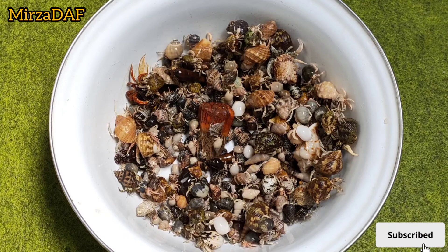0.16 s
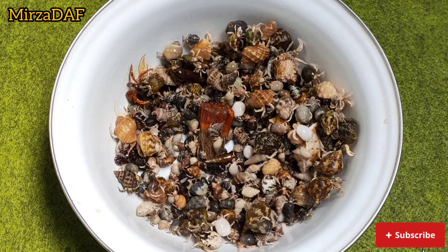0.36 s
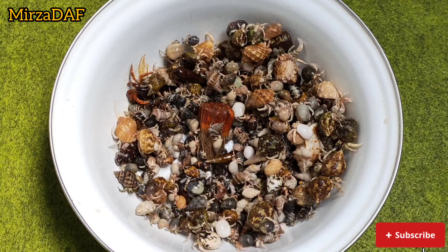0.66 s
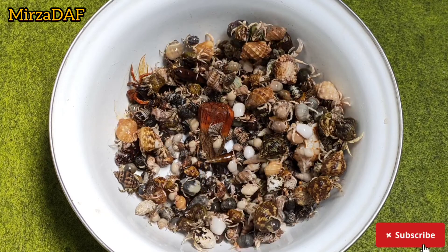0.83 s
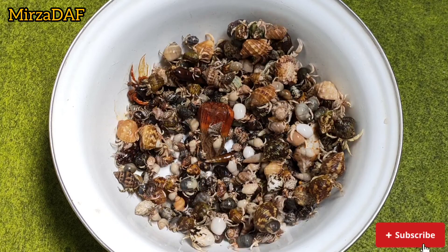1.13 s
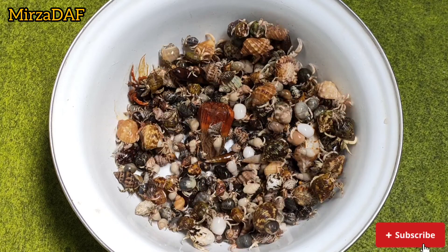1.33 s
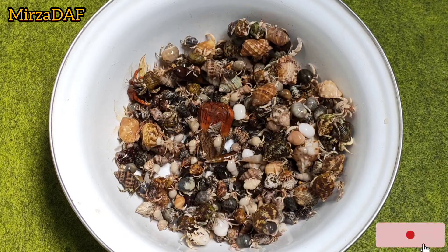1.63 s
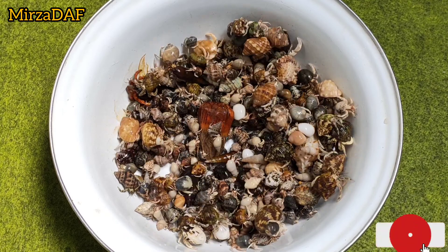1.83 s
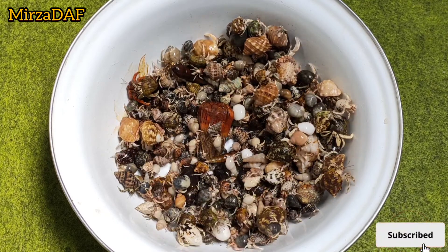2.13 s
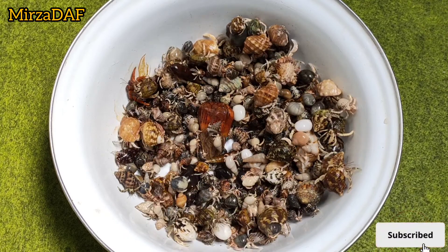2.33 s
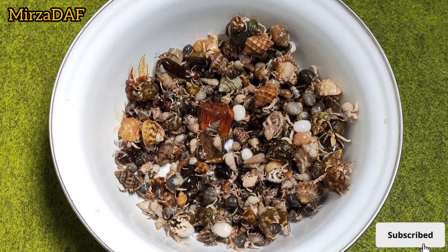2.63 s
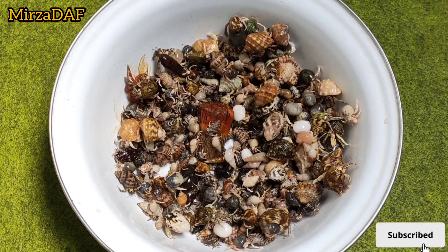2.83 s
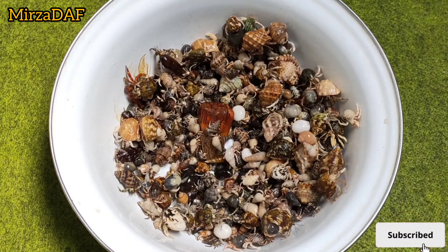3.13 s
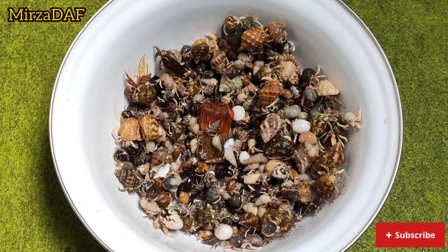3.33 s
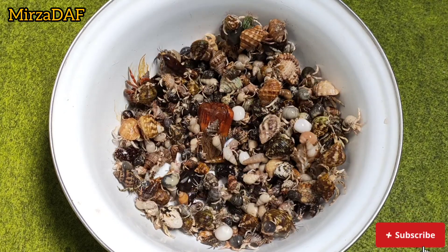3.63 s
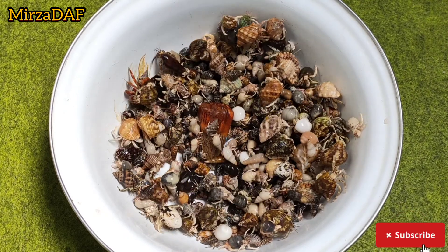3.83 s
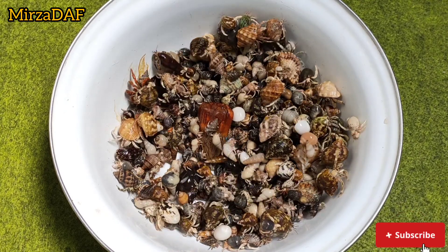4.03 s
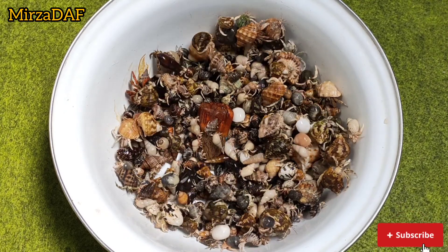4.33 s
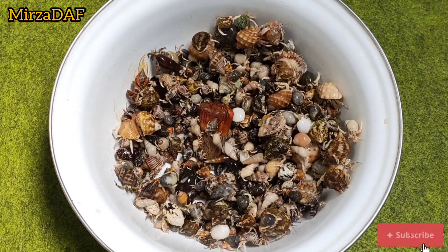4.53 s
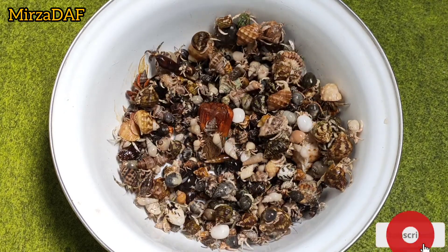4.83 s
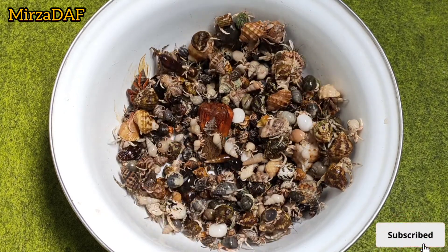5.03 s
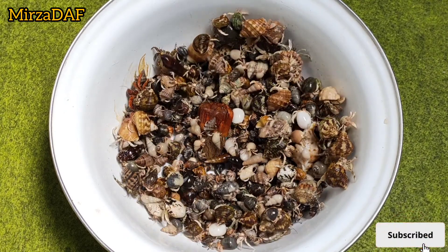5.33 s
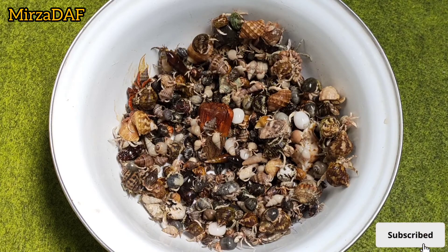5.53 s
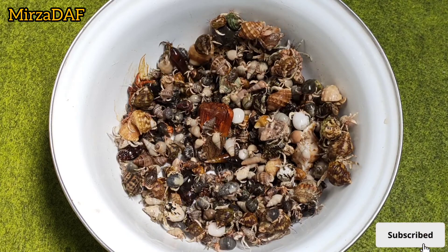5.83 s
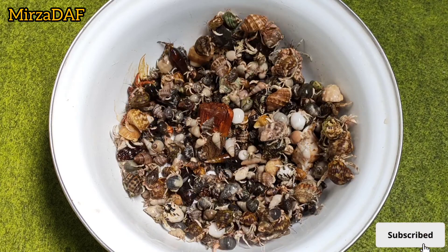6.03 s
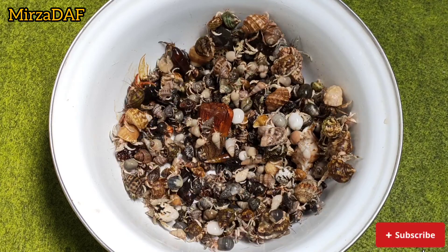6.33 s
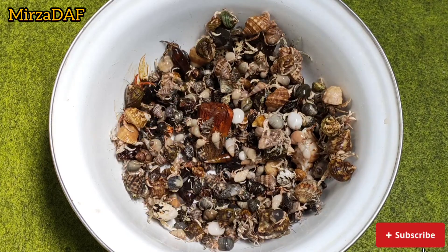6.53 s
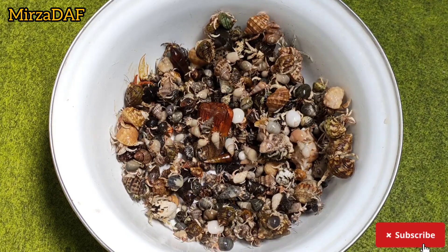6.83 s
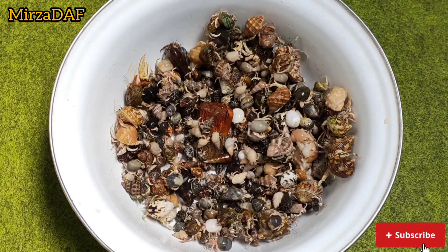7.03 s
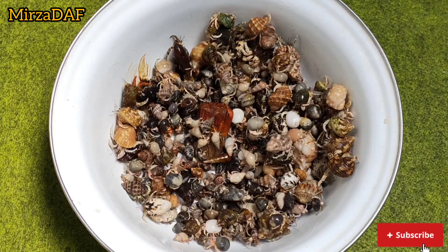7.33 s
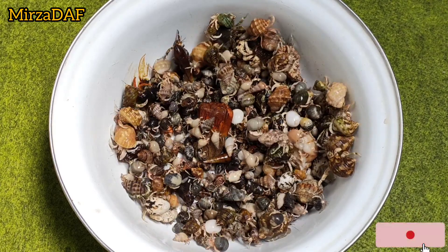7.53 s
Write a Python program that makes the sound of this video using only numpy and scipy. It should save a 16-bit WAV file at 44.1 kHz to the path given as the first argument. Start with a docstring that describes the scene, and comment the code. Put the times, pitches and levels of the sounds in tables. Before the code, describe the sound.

Dozens of small hermit crabs crawl in a plastic bowl, heard very close in stereo. Crisp, high shell clacks come singly and in quick uneven clusters, some with a light plastic knock beneath. A continuous fine patter of legs fills the gaps, with brief scrapes and one soft gritty rustle early on. A small room answers shortly; faint air noise, low hum and a few dull bumps lie behind.

```python
"""Shells clack and chatter over a fine patter of legs: hermit crabs crawl over each other in a plastic bowl,
close under a stereo microphone. Each clack is a cluster of random taps ringing a shell and the modes of the bowl.
Patter is many lighter shell taps; scrapes and rustle are uneven, filtered noise; a small room answers with noise tails.
Behind are noise for room air, drifting sines for appliance hum, low drone and a faint far tone,
and a few dull bumps of filtered noise."""
import sys
import numpy as np
from scipy import signal
from scipy.fft import rfft, irfft
from scipy.io import wavfile

SR = 44100
rng = np.random.default_rng(int(sys.argv[2]) if len(sys.argv) > 2 else 0)


def generate_wav(signal):
    """Clip the signal to [-1, 1] and save it as 16-bit WAV at the path in sys.argv[1]."""
    frames = np.transpose(np.atleast_2d(signal))
    scaled = np.clip(frames, -1, 1) * 32767
    pcm = np.round(scaled).astype(np.int16)
    wavfile.write(sys.argv[1], SR, pcm)


N = 338240
BINS = np.fft.rfftfreq(2048, 1 / SR)  # Hz, for the colours of the clicks
LEAD_S = .003  # a shell starts to slip this long before it hits


def amp(db):
    """Decibels to gain."""
    return 10 ** (np.asarray(db) / 20)


def evened(x):
    """Scales to an rms of one over all channels."""
    return x / np.sqrt(np.mean(x ** 2) + 1e-20)


def unit(x):
    """Scales each channel to an energy of one."""
    return x / np.sqrt(np.sum(x ** 2, -1, keepdims=True) + 1e-20)


def read(points, hz):
    """Reads a table of (Hz, value) on a log-frequency axis."""
    f, value = np.transpose(points)
    return np.interp(np.log(hz + 1), np.log(f + 1), value)


def follow(rows):
    """Joins the rows of a curve over time, one array for each column after the seconds."""
    s, *columns = np.transpose(rows)
    return [np.interp(np.arange(N) / SR, s, c) for c in columns]


def add(mix, s, sound):
    """Adds a stereo sound at a time in seconds."""
    part = mix[:, max(round(s * SR), 0):][:, :sound.shape[1]]
    part += sound[:, :part.shape[1]]


def wander(per_s):
    """Slow random drift with an rms of one, mostly below per_s cycles a second."""
    size = 8192
    hz = np.fft.rfftfreq(size, N / SR / size)
    spectrum = rfft(rng.standard_normal(size)) / (1 + (hz / per_s) ** 4)
    drift = evened(irfft(spectrum))
    return np.interp(np.arange(N) * size / N, np.arange(size), drift)


def tone(hz):
    """A sine that follows a changing pitch."""
    return np.sin(2 * np.pi * np.cumsum(hz) / SR)


def causal(db):
    """The sharpest click that has this spectrum (minimum phase)."""
    log_gain = np.log(amp(np.concatenate([db, db[-2:0:-1]])))
    spectrum = np.exp(np.conj(signal.hilbert(log_gain)))
    return np.fft.ifft(spectrum).real[:len(db) // 2]


def bell(centre_hz, width_hz):
    """The bell shape of a resonance, one at its centre."""
    return 1 / (1 + (2 * (BINS - centre_hz) / width_hz) ** 2)


def burst(length_s, hz, width_hz, grain_db):
    """Uneven friction or a soft push into one resonance: a quick swell and a slower fade."""
    size = int(length_s * SR)
    u, f = np.arange(size) / size, np.fft.rfftfreq(size, 1 / SR)
    grains = np.interp(u * length_s, np.arange(500) / 500, rng.standard_normal(500))  # 500 a second
    push = rng.standard_normal((2, size)) * amp(grain_db * grains)
    ring = irfft(rfft(push) / (1 + (2 * (f - hz) / width_hz) ** 4), size)
    return evened(ring * np.sin(np.pi * u ** 0.51))


def room_air(level_db=-54):
    """Broadband noise of the room, much alike at both ears in the bass and mostly separate above."""
    # Colour of the air. Each row: frequency in Hz, relative level in dB per Hz.
    air_colour = [(10, 3.5), (25, -2.5), (45, -4.5), (90, 2.5), (125, -1), (180, -13.5), (280, -15.5),
                  (460, -16.5), (650, -16), (900, -21.5), (2500, -23.5), (5000, -34), (16000, -31.5)]
    # Left-right likeness of the air. Each row: frequency in Hz, correlation from 0 to 1.
    likeness = [(50, .999), (125, .97), (250, 0.84), (500, 0.065), (1000, 0.163), (4000, 0.16)]
    hz = np.fft.rfftfreq(N, 1 / SR)
    left, other = rfft(rng.standard_normal((2, N)))
    same = read(likeness, hz)
    right = same * left + np.sqrt(1 - same ** 2) * other
    return amp(level_db) * evened(irfft(np.array([left, right]) * amp(read(air_colour, hz)), N))


def appliance_hum(waver_hz=1.33, flutter_db=2.17):
    """Steady partials, each wavering a little in pitch and level on its own."""
    # Partials of the hum. Each row: frequency in Hz, rms level in dB before the flutter.
    partials = [(89, -59.5), (131, -67), (300, -72), (550, -71.5), (599, -75.5), (850, -83.5)]
    hum = np.zeros(N)
    for hz, db in partials:
        level = amp(db + flutter_db * wander(3.8))
        hum += level * tone(hz + waver_hz * wander(7.7))
    return np.sqrt(2) * hum  # a sine of rms one


def low_drone(level_db=-1, waver_hz=1.47, flutter_db=1.0):
    """One low sine that swells, sinks and drifts in pitch."""
    # Course of the drone. Each row: time in seconds, pitch in Hz before the waver,
    # rms level in dB before level_db and the flutter.
    drone_course = [(0.0, 42.33, -52), (1.09, 42.2, -47), (2.69, 42.4, -59), (2.78, 44.67, -54),
                    (3.56, 47.8, -50.5), (4.23, 47.63, -42.5), (5.45, 47.8, -43), (5.83, 46.95, -55),
                    (6.09, 46.1, -48), (7.01, 47.7, -56.5), (7.39, 47.7, -46), (7.67, 47.8, -50)]
    pitch, db = follow(drone_course)
    level = amp(db + level_db + flutter_db * wander(9.6))
    return np.sqrt(2) * level * tone(pitch + waver_hz * wander(6.7))


def whine(hz=400, waver_hz=7):
    """A faint far tone with a wavering pitch comes and goes."""
    # Each row: time in seconds, rms level in dB.
    swell = [(4.8, -110), (4.95, -69), (5.2, -67), (5.43, -70), (5.55, -110)]
    return np.sqrt(2) * amp(follow(swell)[0]) * tone(hz + waver_hz * wander(10.25))


def bumps(level_db=-1, upper_db=-13, side=.3):
    """Soft low bumps with a weaker, broader resonance an octave up, nearly the same at both ears."""
    # Dull bumps. Each row: start in seconds, length in seconds, centre in Hz, width in Hz,
    # level in dB before level_db.
    bump_rows = [(3.285, .075, 248, 400, -53), (3.444, 0.075, 160, 82, -48), (3.8, .12, 175, 38, -54.5),
                 (5.289, 0.073, 630, 130, -55), (5.78, 0.094, 157, 62, -47.5), (6.865, .13, 89, 15, -52.5)]
    out = np.zeros((2, N))
    for s, length_s, hz, width_hz, db in bump_rows:
        upper = amp(upper_db) / (1 + (hz / 400) ** 2)  # strongest for the deep bumps
        low_push = burst(length_s, hz, width_hz, 0)
        mid, apart = low_push + upper * burst(length_s, 2 * hz, 2 * width_hz, 0)
        add(out, s, amp(db + level_db) * (evened(mid) + side * np.array([apart, -apart])))
    return out


def room(x, rise_s=0.0067, count=3):
    """Dense noise tails whose treble dies first; successive clicks meet slightly different echoes."""
    # Decay of the room. Each row: frequency in Hz, time to fall by 60 dB in seconds.
    decay = [(300, 0.27), (2700, 0.31), (7000, 0.23), (15000, 0.2)]
    hz, t, z = signal.stft(rng.standard_normal((count, 2, SR // 2)), SR, nperseg=256)
    faded = z * amp(-60 * t / read(decay, hz)[:, None])
    tails = signal.istft(faded, SR, nperseg=256)[1]
    tail_t = np.arange(tails.shape[-1]) / SR
    tails = unit(tails * (1 - np.exp(-(tail_t / rise_s) ** 2)))
    turn = 2 * np.pi * np.arange(N) / SR  # the blend of tails turns once a second
    out = np.zeros((2, N))
    for k, tail in enumerate(tails):
        share = np.sqrt(2 / count) * np.cos(turn + np.pi * k / count)
        out += signal.oaconvolve(x * share, tail, axes=1)[:, :N]
    return out


def rustle(grain_db=3, grains_per_s=150):
    """Something brushes softly for half a second, catching as it goes: noise with uneven force."""
    # Course of the rustle. Each row: time in seconds, level in dB.
    brushing = [(1.95, -78), (2.1, -55), (2.25, -51.5), (2.42, -45), (2.52, -49.5), (2.62, -83),
                (2.7, -100)]
    # Gritty colour of the rustle. Each row: frequency in Hz, relative level in dB per Hz.
    grit_colour = [(100, -10), (250, -2.5), (500, 0), (900, -5), (1600, -8.5), (4000, -6), (8000, -1),
                   (16000, -10.5)]
    colour = amp(read(grit_colour, np.fft.rfftfreq(N, 1 / SR)))
    friction = rng.standard_normal((2, N)) * amp(grain_db * wander(grains_per_s))
    return amp(follow(brushing)[0]) * evened(irfft(rfft(friction) * colour, N))


def scrapes(level_db=-1, grain_db=5):
    """Claws and shells slide on the plastic, their uneven friction sounding one resonance."""
    # Scrapes on the bowl. Each row: start in seconds, length in seconds, centre in Hz, width in Hz,
    # level in dB before level_db.
    scrape_rows = [(0.381, 0.1, 3440, 4460, -55), (.94, 0.055, 2430, 900, -62),
                   (1.115, 0.052, 2640, 700, -62), (1.528, 0.089, 2630, 600, -63),
                   (1.716, .05, 2620, 1200, -60), (1.861, 0.042, 2570, 400, -56),
                   (6.264, 0.067, 1800, 1210, -57.5), (6.551, 0.021, 1533, 910, -55.5),
                   (6.629, 0.085, 1900, 2400, -60.5), (7.096, 0.13, 2683, 1300, -54)]
    out = np.zeros((2, N))
    for s, length_s, hz, width_hz, db in scrape_rows:
        add(out, s, amp(db + level_db) * burst(length_s, hz, width_hz, grain_db))
    return out


def overtones(count=7, width_hz=220, height_db=7):
    """The narrow modes that make one shell differ from the next, in dB."""
    modes = bell(rng.uniform(4900, 15360, (count, 1)), width_hz)
    return height_db * modes.max(0)


def chatter(decay_s, delay, per_s=6000, first=0.15, contact_s=0.00055, alike=0.39):
    """Shells slip, meet in a brief rough contact, then rebound and echo in the bowl, a bit apart at each ear."""
    slip, slip_s = .02, .0008  # energy and decay time of the slip; first is the contact's share of energy
    t = np.arange(SR // 36) / SR - LEAD_S
    hits = rng.standard_normal((3, len(t))) * (rng.random((3, len(t))) < per_s / SR)
    both_ears = np.sqrt(alike) * hits[0] + np.sqrt(1 - alike) * hits[1:]
    rebounds = unit(both_ears * (t > 0) * np.exp(-abs(t) / (2 * decay_s)))
    grit = rng.choice([-1, 1], len(t))
    contact = unit(grit * (t >= 0) * np.exp(-abs(t) / (2 * contact_s)))
    slide = unit(grit * (t < 0) * np.exp(-abs(t) / (2 * slip_s)))
    left, right = np.sqrt(slip) * slide + np.sqrt(first) * contact + np.sqrt(1 - first) * rebounds
    return np.array([left, np.roll(right, round(delay))])  # delay in samples


def patter(level_db=1.0, ring_db=9, ring_width_hz=350, vary_db=3, count=40):
    """Many legs tap many shells, each with its own ring and place in the heap."""
    # How busily the heap crawls. Each row: time in seconds, level in dB before level_db.
    bustle = [(0.0, -51), (0.3, -49.5), (1.11, -54.5), (1.62, -48), (1.83, -51.5), (2.39, -51.5),
              (2.58, -55.5), (3.27, -57), (3.44, -53.5), (4.04, -54.5), (4.8, -51), (5.47, -61.5),
              (5.7, -56), (6.11, -56), (6.6, -49), (7.01, -54.5), (7.26, -52), (7.67, -52.5)]
    # Colour of leg patter. Each row: frequency in Hz, relative level in dB per Hz.
    leg_colour = [(200, -46), (800, -22), (1600, -12), (2650, -7), (3800, -5), (5200, -5.5), (6400, 0.5),
                  (8000, 3), (9800, -4.5), (12000, -7.5), (16000, -11)]
    taps_each, spread_db, clump_db, chatter_s = 60, 5, 1.2, .0015
    out = np.zeros((2, N))
    for _ in range(count):
        colour = read(leg_colour, BINS) + ring_db * bell(rng.uniform(5540, 10170), ring_width_hz)
        colour = colour + overtones()
        colour = colour + vary_db * (rng.normal() * bell(1700, 2500) + rng.normal() * bell(16700, 4400))
        taps = chatter(chatter_s, rng.uniform(-4.5, 7))
        tick = unit(signal.fftconvolve(taps, causal(colour)[None], axes=1))
        force = np.minimum(rng.exponential(1, taps_each), 3)
        for s, db in zip(rng.random(taps_each) * N / SR, spread_db * force):
            add(out, s, amp(db) * tick)
    clumped = evened(out * amp(clump_db * wander(14)))
    return amp(level_db + follow(bustle)[0]) * clumped


def faint_clacks(count=28, level_db=-50.5, low_hz=6200, high_hz=8700):
    """Light touches of shell on shell at random moments, as rows like those of the louder clacks."""
    sparkle_db, knock_db, chatter_s = -10, -14, .0025
    rows = []
    for k, (when, small, side) in enumerate(rng.random((count, 3))):
        s = (k + when) / count * N / SR  # one in each equal stretch of time
        ring_hz = low_hz + (high_hz - low_hz) * small
        pan_db = 2 * (2 * side - 1)
        rows.append((s, level_db, sparkle_db, knock_db, ring_hz, pan_db, chatter_s))
    return rows


def clacks(ring_db=6, ring_width_hz=500, sparkle_db=8, knock_db=-1.5, body=0.5, room_db=-2.5):
    """Each clack rings one shell and knocks on the bowl beneath; the room answers both."""
    # Louder clacks of shell on shell. Each row: time in seconds, level of the shell in dB,
    # top sparkle in dB before sparkle_db, knock of the bowl in dB before knock_db, shell ring in Hz,
    # left over right in dB, decay time of the chatter in seconds.
    loud_clacks = [(0.0588, -33.5, -10, -6.5, 6300, -0.5, .003), (.147, -44.5, -9, -22, 8100, 1, .003),
                   (0.2252, -41.5, -20, -16, 8400, 1, .004), (0.244, -47, -1, -31, 8600, 1, 0.0018),
                   (.3815, -32, 1, -16.5, 7350, -0.5, .002), (0.399, -34.5, -1, -35, 8500, 8, .004),
                   (.413, -32.5, -2, -16, 8500, -1, 0.0036), (0.4483, -44.5, -6, -9, 7500, 0, 0.0045),
                   (0.529, -37.5, -4.5, -16, 7960, -6.5, .002), (.789, -40.5, -7, -22, 7650, 1, .004),
                   (0.956, -40.5, -15, -23, 6300, -2, 0.0054), (0.9854, -37, -18, -17, 6400, 0, 0.0058),
                   (1.0307, -39, -4, -11, 7350, 0, 0.0022), (1.1322, -47.5, -25, -4.5, 5480, -1, .004),
                   (1.223, -46, -26, -38, 7235, -1, .0008), (1.314, -55, -10, -7, 7120, 1, 0.0012),
                   (1.34, -39.5, 0, -17, 9500, 2, 0.0022), (1.3884, -30.5, -10, -28.5, 8200, 0, 0.012),
                   (1.5951, -32, -8, -54, 8300, -9, 0.0016), (1.6202, -34, -11, -43, 7440, -1, .004),
                   (1.7031, -34.5, -13, -35, 8400, -1, 0.014), (1.7332, -33.5, -13, -23, 7050, 0, 0.0044),
                   (1.802, -45.5, -17, -8, 8590, -1, .0024), (1.9752, -47, -18, -11, 8300, -10, .0025),
                   (2.0706, -37.5, -14, -15.5, 8400, 7, .0013), (2.1486, -28.5, -13, -38, 8060, 0, .004),
                   (2.166, -37, -7, -27, 8400, 2, .001), (2.225, -38, -7, -30, 8140, 3, 0.0016),
                   (2.6171, -41.5, -5, -18, 8160, -1, 0.0017), (2.7236, -34, -14, -22, 7700, 2, .003),
                   (2.8126, -39.5, -20, -24, 7200, -1, .0015), (3.0134, -35.5, -10, -37, 8300, -1, 0.0012),
                   (3.0616, -43.5, -6, -19, 8300, 2, 0.005), (3.2286, -39.5, -11, -20, 7340, -1, .0045),
                   (3.2629, -35.5, -14, -16.5, 6600, 1, 0.0051),
                   (3.3258, -37.5, -6, -11.5, 7100, -1, 0.014), (3.356, -39.5, -13, -9.5, 6400, 0, 0.0068),
                   (3.476, -37.5, -8, -13, 7350, 1, 0.0034), (3.4993, -32.5, -5, -21, 8600, -2, 0.0015),
                   (3.6073, -33, -11, -19.5, 8500, 0, 0.0048), (3.7582, -27, -6, -25, 8850, 3, 0.0021),
                   (3.9009, -43, -6, -13, 7160, 1, 0.0064), (4.0598, -40.5, -11, -40, 8350, -3, 0.0019),
                   (4.0945, -43.5, -7, -25, 7300, -3, 0.0023), (4.113, -44, -5, -31, 7200, -1, 0.003),
                   (4.231, -46, -10, -40, 8500, -4, 0.0017), (4.2699, -35, -9, -22, 7300, -2, 0.0044),
                   (4.5632, -30.5, -2.5, -34, 9600, -7, 0.0013), (4.7766, -42.5, -5, -15, 7310, 2, 0.0019),
                   (4.8394, -30, -12, -19, 6100, -4, 0.0076), (4.8634, -36, -5, -17, 7500, 1, 0.0026),
                   (4.9148, -30.5, -7, -42, 8100, 2, 0.0018), (4.9835, -42.5, -11, -15, 6040, -2, .005),
                   (5.1556, -27, -9, -11.5, 7400, 0, 0.0019), (5.2456, -31, -9, -33, 8140, -1, 0.0022),
                   (5.386, -43.5, -11, -8.5, 6000, -1, 0.011), (5.541, -43.5, -4, -13.5, 9170, -1, .0026),
                   (5.6295, -44.5, -11, -14.5, 7800, 1, 0.0022), (5.7256, -38.5, -6, -45, 7240, 0, 0.0061),
                   (5.771, -41, -8, -35, 8250, 2, .002), (5.8125, -46, -6, -16, 7400, -1, 0.009),
                   (5.9116, -44.5, 3, -41, 9800, 3, .0014), (6.133, -28, -10, -7.5, 7420, 0, .009),
                   (6.403, -39.5, -9, -38, 7120, 1, 0.0077), (6.5522, -53.5, -14, 2, 7200, 0, 0.0018),
                   (6.6188, -34, -18, -24, 7300, -1, 0.0029), (6.6637, -40, -11, -12, 7400, -2, 0.0027),
                   (6.7218, -43, -3, -16, 7030, -1, .0014), (6.7473, -37, -11, -18, 8540, 0, 0.0026),
                   (6.782, -32, -11, -21, 6100, -1, 0.016), (6.9781, -42.5, -4, -9.5, 7400, 1, 0.0013),
                   (7.1109, -40.5, -17, -10, 7200, -2, 0.021), (7.1419, -29.5, -18, -15, 6160, -1, .007),
                   (7.2571, -30.5, -13, -55, 7800, -2, .001), (7.2714, -30, -6, -60, 9100, 1, 0.0013),
                   (7.3524, -19, -14, -37.5, 6170, 0, 0.0024), (7.365, -36.5, -14, -11, 7400, -4, 0.0018)]
    # Colour of a shell click. Each row: frequency in Hz, relative level in dB per Hz.
    shell_colour = [(100, -19), (600, -21), (1500, -20.5), (3000, -14), (4200, -11.5), (5200, -6.5),
                    (6300, -1.5), (8200, 2), (9800, -3), (12000, -7.5), (15000, -7), (16000, -8)]
    # Damped modes of the bowl. Each row: frequency in Hz, relative level in dB,
    # time to fall by 60 dB in seconds.
    bowl_modes = [(570, -28, 0.02), (1010, -15, 0.039), (1440, -10.5, 0.0084), (1827, 0.5, 0.012),
                  (2276, -7.5, 0.05), (2569, -3, 0.057), (2750, -2, 0.048), (2970, 0, 0.012),
                  (3450, -29, 0.0055)]
    # The right ear hears a clack later by about this much, depending on its place in the heap.
    delay, delay_spread = 3.5, 3  # samples
    near, radiated = np.zeros((2, N)), np.zeros((2, N))
    t = np.arange(SR // 16) / SR
    top = np.clip((BINS - 9000) / 3000, 0, 1)
    low = np.clip((6200 - BINS) / 1200, 0, 1)
    modes = np.array([amp(d - 60 * t / t60) * np.exp(2j * np.pi * f * t) for f, d, t60 in bowl_modes])
    for s, db, sparkle, knock, hz, pan, chatter_s in loud_clacks + faint_clacks():
        colour = read(shell_colour, BINS) + ring_db * bell(hz, ring_width_hz) + overtones()
        colour = colour + low * body * (knock + 20)  # a stronger knock brings a fuller shell
        # the level is that of the shell's main ring, the sparkle comes on top
        main_ring = np.sqrt(np.mean(amp(colour - 41 * top) ** 2))
        shell = causal(colour + top * (sparkle + sparkle_db)) / main_ring
        phase = np.exp(2j * np.pi * rng.random((len(modes), 1)))  # struck at a different spot each time
        bowl = amp(knock + knock_db) * unit((phase * modes).real.sum(0))
        taps = chatter(chatter_s, delay + delay_spread * rng.normal())
        size = amp(db) * np.sqrt(SR / 100)  # level as the rms over 10 ms
        for ring in (shell, bowl):
            rattle = np.linalg.norm(ring) * unit(signal.fftconvolve(taps, ring[None], axes=1))
            add(near, s - LEAD_S, size * amp([[pan / 2], [-pan / 2]]) * rattle)
            add(radiated, s, size * np.array([ring, ring]))
    return near + amp(room_db) * room(radiated)


def scene(room_db=-2.0):
    """The bowl of crabs close by, its room and the sounds behind."""
    behind = room_air() + appliance_hum() + low_drone() + whine() + bumps()
    crawling = rustle() + scrapes() + patter()
    return behind + crawling + amp(room_db) * room(crawling) + clacks()


def record(dry, edge_hz=15900):
    """The two sides of the stereo microphone differ in tone, most at the very top; then the band limit."""
    # Each row: frequency in Hz, left over right in dB.
    balance = [(200, 0.5), (500, -0.5), (5000, -1.0), (8500, 0.5), (13000, 0.5), (16000, -10.0)]
    lean_db = read(balance, np.fft.rfftfreq(N, 1 / SR))
    heard = irfft(rfft(dry) * amp([lean_db / 2, -lean_db / 2]), N)
    low_pass = signal.firwin(255, edge_hz, window=("kaiser", 8), fs=SR)
    return signal.oaconvolve(heard, low_pass[None], "same")


dry = scene()
out = record(dry)
generate_wav(out)
```